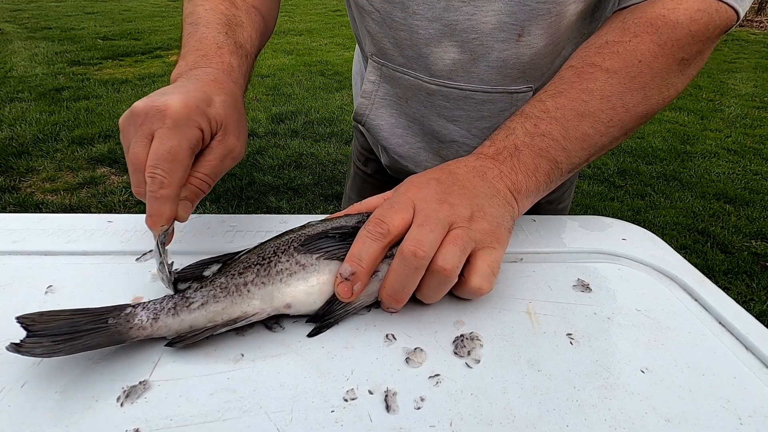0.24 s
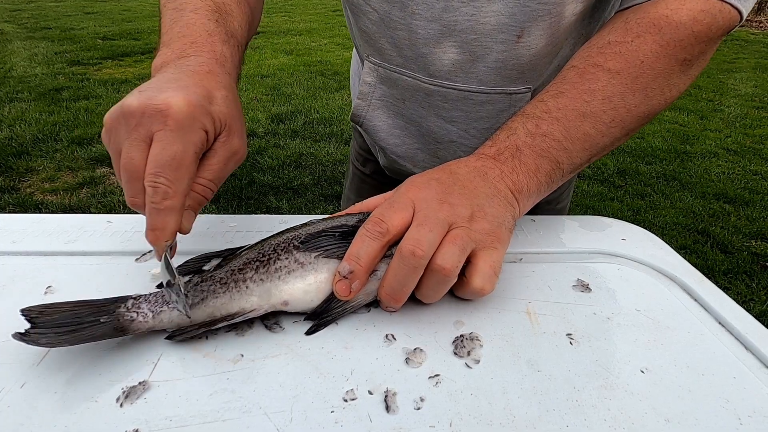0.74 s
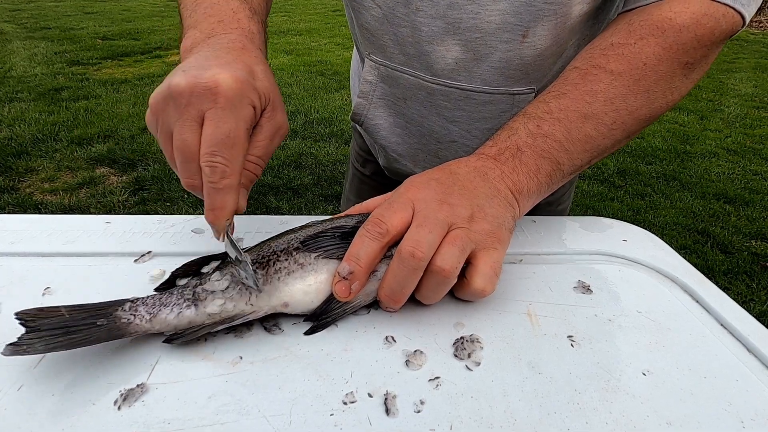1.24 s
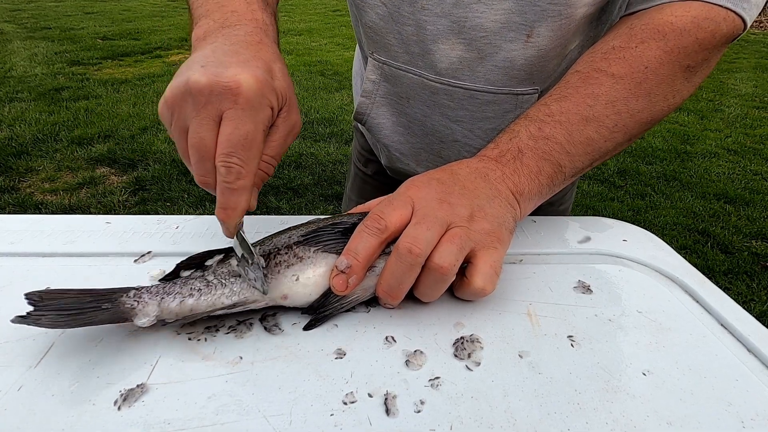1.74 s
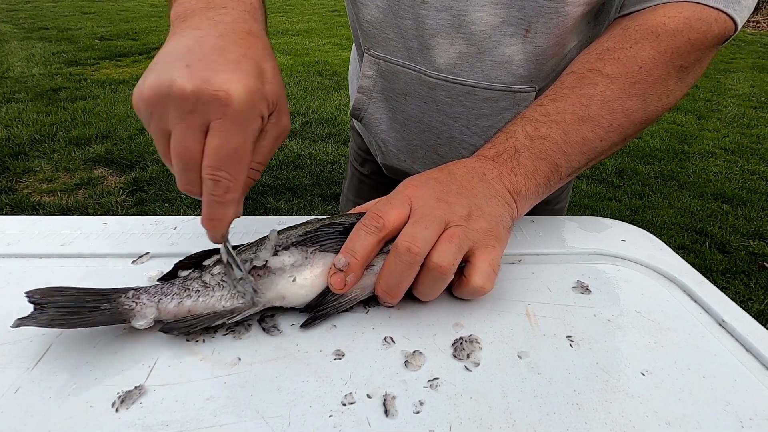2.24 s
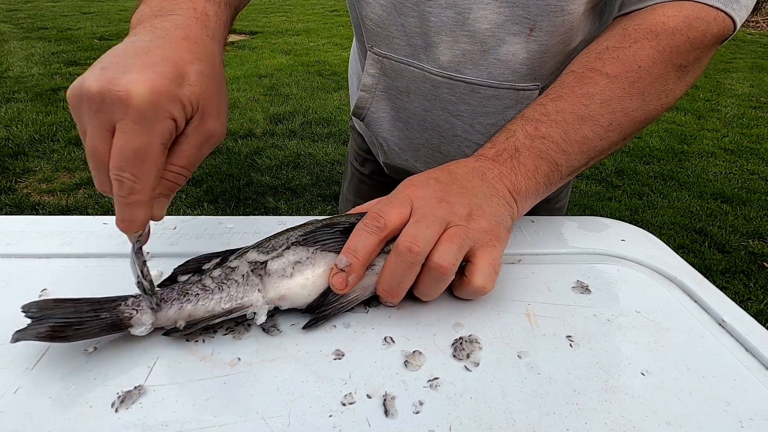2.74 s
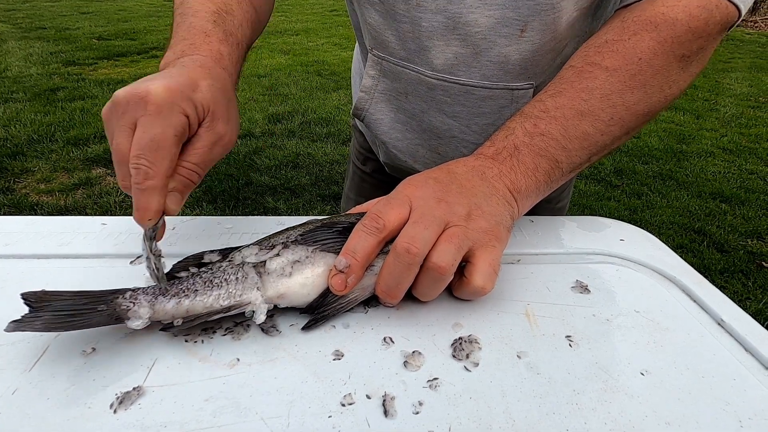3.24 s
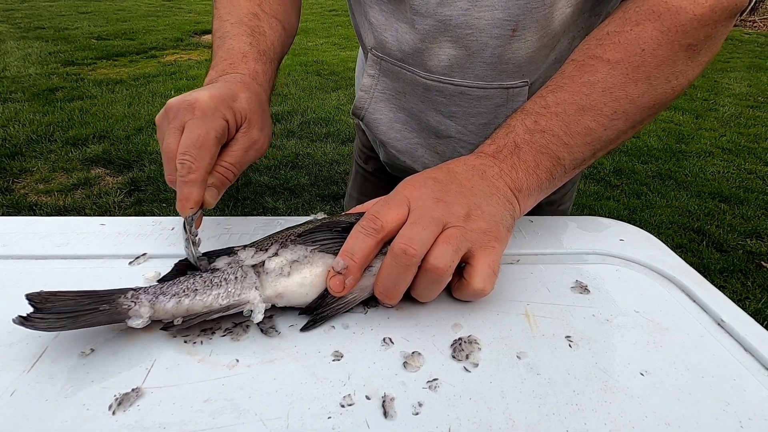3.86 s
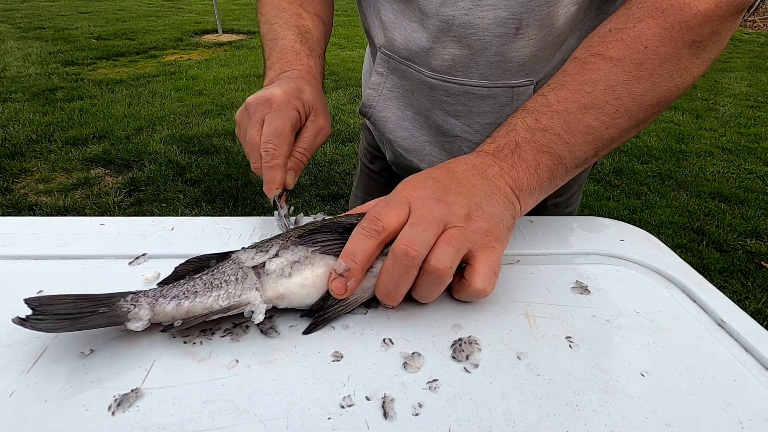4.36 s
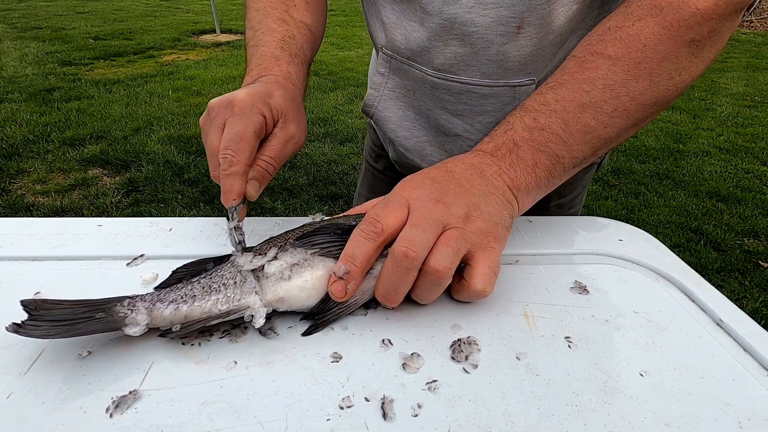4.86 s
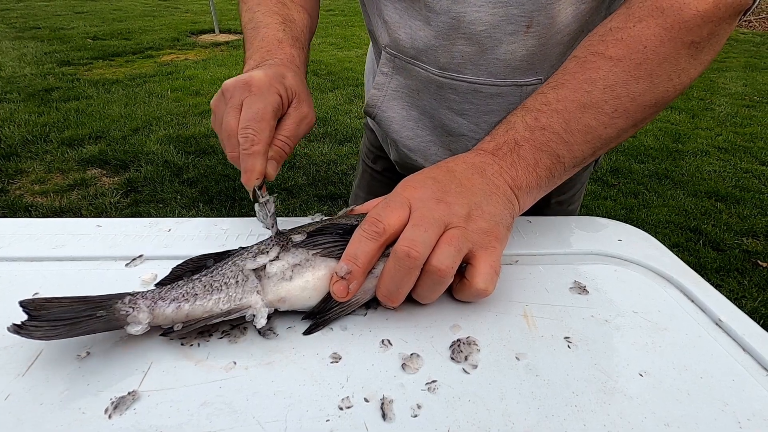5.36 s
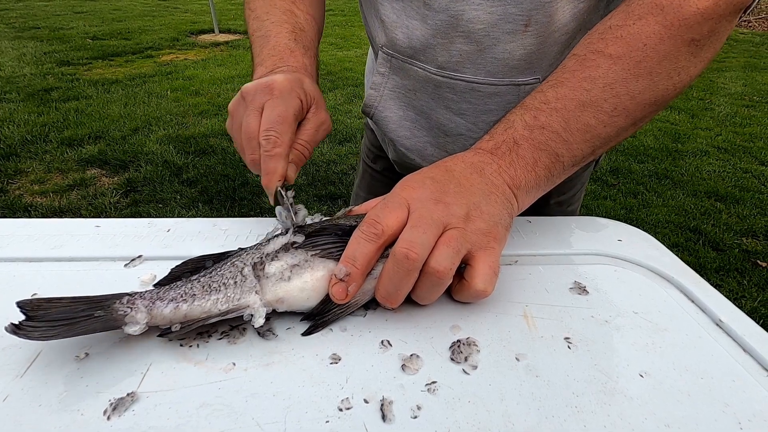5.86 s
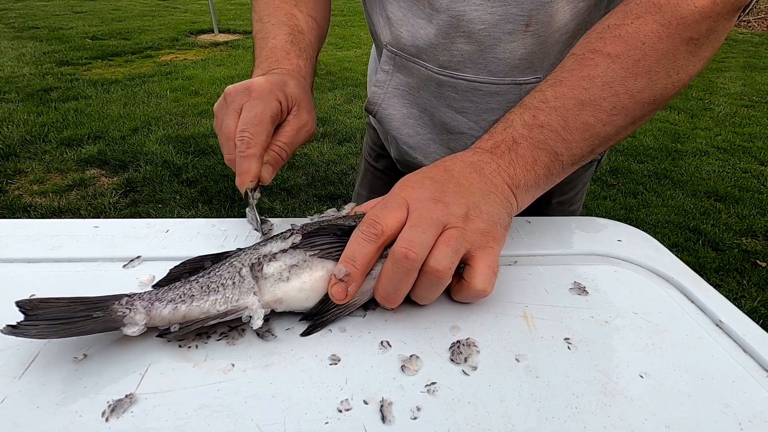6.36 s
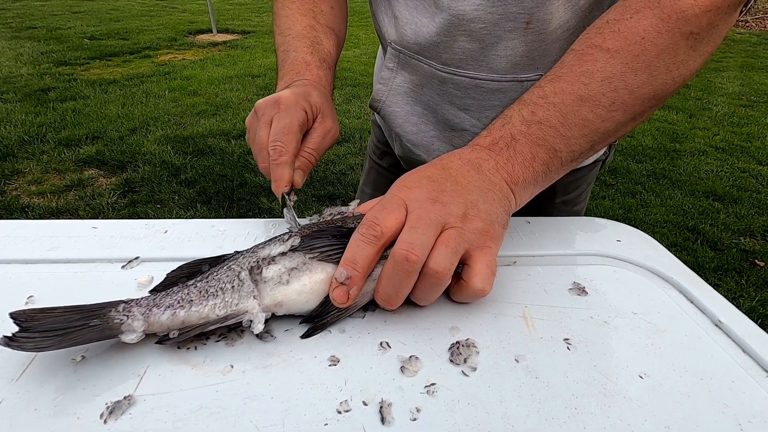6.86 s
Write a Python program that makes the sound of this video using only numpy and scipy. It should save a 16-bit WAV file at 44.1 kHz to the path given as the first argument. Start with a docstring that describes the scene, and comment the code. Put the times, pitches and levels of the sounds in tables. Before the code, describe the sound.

Close, dry outdoor sound of a metal spoon scraping a fish on a hollow plastic table. Short gritty rasps come three to four a second, each landing with a low thud and a drumming judder of the tabletop. Scales snap off with tiny bright clicks, wet skin squelches now and then, and quiet open air lies behind.

```python
"""Three to four raspy strokes a second, with snaps, wet squelches and low thuds over quiet open air:
a metal spoon scrapes the scales off a fish on a hollow plastic table on a lawn.
Rasp and slush are dense decaying slips; snaps are short ringing flicks; squelches and plops are noise resonances.
The table sums filtered judder, slow rocking and damped low swings; a faint far-off tone slides down.
Two ports receive the sum with their own balance and phase."""
import sys
import numpy as np
from scipy import signal
from scipy.fft import rfft, irfft
from scipy.io import wavfile
from scipy.ndimage import uniform_filter1d

SR = 44100
rng = np.random.default_rng(int(sys.argv[2]) if len(sys.argv) > 2 else 0)


def generate_wav(signal):
    """Clip the signal to [-1, 1] and save it as 16-bit WAV at the path in sys.argv[1]."""
    frames = np.transpose(np.atleast_2d(signal))
    scaled = np.clip(frames, -1, 1) * 32767
    pcm = np.round(scaled).astype(np.int16)
    wavfile.write(sys.argv[1], SR, pcm)


N = 313452
TIME = np.arange(N) / SR

# Spoon strokes, levels ahead of the layer gains: touch_s, build_up_to_crest_s, run_out_to_lift_s,
# rasp_db, push_into_table_db, landing_thud_db
STROKE_ROWS = [(-.018, .056, .04, -42, -39.5, -27), (.244, 0.042, 0.05, -51, -35, -54),
               (.508, 0.07, 0.059, -53, -37.5, -56), (.755, .06, 0.035, -42, -36.5, -46.5),
               (.975, 0.069, .05, -42, -34.5, -48), (1.236, .058, .042, -35, -38, -37.5),
               (1.505, 0.058, 0.073, -38, -39, -36), (1.776, 0.055, 0.095, -38, -41.5, -35.5),
               (2.045, 0.062, 0.096, -42, -38.5, -25), (2.324, 0.083, 0.029, -43, -43.5, -29.5),
               (2.609, 0.081, 0.052, -46, -49.5, -36.5), (2.88, 0.051, .085, -35, -40.5, -32),
               (3.132, 0.059, 0.094, -37.5, -35.5, -25), (3.4, .08, 0.097, -43, -39, -31.5),
               (3.724, 0.062, 0.083, -43.5, -35.5, -34), (4.041, 0.087, 0.052, -45.5, -41, -47),
               (4.369, .075, .05, -48, -42.5, -33.5), (4.669, 0.069, .065, -46, -38.5, -35),
               (4.973, .1, 0.048, -43, -33.5, -41), (5.295, .043, 0.099, -38.5, -46, -38),
               (5.619, 0.042, 0.1, -36.5, -48, -37), (5.94, 0.049, 0.087, -39, -39, -36.5),
               (6.256, .05, 0.077, -38, -42, -34.5), (6.542, 0.058, .04, -48.5, -36.5, -34.5),
               (6.812, 0.043, 0.048, -55.5, -37.5, -44)]
# Spectral density of the edge on scales, scaled to unit power in use: frequency_hz, relative_db
RASP_COLOUR = [(1200, -37), (2300, -2.5), (3000, -4), (3700, 1), (4300, 0.5), (5000, 0), (5800, 3.5),
               (6300, -9), (7300, -3.5), (9000, -8), (12000, -9), (14000, -13), (16000, -36)]


def undb(db):
    """Level to amplitude: 20 dB is a factor of ten."""
    return 10 ** (np.asarray(db) / 20)


def along(points, hz):
    """Interpolation on a log-frequency axis, where equal steps are equal ratios."""
    f, value = np.transpose(points)
    return np.interp(np.log(np.maximum(hz, 1)), np.log(f), value)


def colour(x, points):
    """Minimum-phase filtering: the folded cepstrum gives a causal response; white noise keeps its power."""
    size = 8192
    gain = undb(along(points, np.fft.rfftfreq(size, 1 / SR)))
    cepstrum = irfft(np.log(gain / np.sqrt(np.mean(gain ** 2))))
    cepstrum[1:size // 2] *= 2
    cepstrum[size // 2 + 1:] = 0
    response = irfft(np.exp(rfft(cepstrum)))
    return signal.fftconvolve(x, response)[:N]


def unit(x):
    """Power normalisation to rms 1."""
    return x / np.sqrt(np.mean(x ** 2))


def walk(rate):
    """Band-limited chance: random values, `rate` a second, joined by lines and scaled to rms 1."""
    values = rng.standard_normal(N // 8)
    return unit(np.interp(TIME * rate, np.arange(N // 8), values))


def add(out, s, sound):
    """Superposition: mix a sound in at a time in seconds."""
    start = int(s * SR)
    skip = max(-start, 0)
    part = sound[skip:max(N - start, 0)]
    out[start + skip:start + skip + len(part)] += part


def swell(times, dbs):
    """Exponential growth and decay: straight lines in dB, silent outside them."""
    gain = undb(np.interp(TIME, np.maximum.accumulate(times), dbs))
    return gain * (TIME > times[0]) * (TIME < times[-1])


def even(x, span_s):
    """Power levelling: hold a rough vibration near rms 1, as a steadily pressing hand does."""
    return x / np.sqrt(uniform_filter1d(x ** 2, int(span_s * SR)) + 1e-12)


def crackle(rate, spread_db):
    """Shot noise: random tiny slips of uneven size, `rate` a second on average, rms 1."""
    size = undb(spread_db * np.clip(rng.standard_normal(N), -2, 2))
    happens = rng.random(N) < rate / SR
    return unit(happens * rng.choice([-1, 1], N) * size)


def ragged_ring(hz, width_hz):
    """Resonance of finite bandwidth: low-passed noise modulates a carrier that may move; rms 1."""
    noise = rng.standard_normal((2, len(hz)))
    pole = np.exp(-np.pi * width_hz / SR)
    a, b = signal.lfilter([1], [1, -pole], noise)
    phase = 2 * np.pi * np.cumsum(hz) / SR
    return unit(a * np.cos(phase) + b * np.sin(phase))


def slips(gain, rate, spread_db, low_hz, high_hz, cycles, pan_db=3.0, turn=0.44, brighten=0.42, shared=0.39):
    """Stick-slip friction: tiny damped rings of their own pitch and place, denser under a firmer touch."""
    firmness = gain / gain.max()
    density = rate * firmness ** (1 / 4)
    at = np.flatnonzero(rng.random(N) < density / SR)
    size, pitch, pan, lag = rng.standard_normal((len(at), 4)).T
    size = unit(undb(spread_db * np.clip(size, -2, 1.6))) * gain[at]
    size *= np.sqrt(SR / density[at])  # power follows the gain, whatever the density
    # slips from the same scale share some of their pitch; a firmer edge makes them brighter
    lean = shared * walk(250)[at] + brighten * (1 + np.log10(firmness[at]))
    pitch = .5 + .5 * np.tanh(.7 * pitch + lean)
    turns = (low_hz + (high_hz - low_hz) * pitch)[:, None] * np.arange(128) / SR
    flick = turns * np.exp(-turns / cycles)
    out = []
    for side in (1, -1):
        # half the slips have inverted polarity; `turn` spreads the phase between the sides [radians]
        polarity_turns = (lag > 0)[:, None] / 2
        ring = np.sin(2 * np.pi * (turns + polarity_turns) + side * turn * lag[:, None]) * flick
        ring *= (size * undb(side * pan_db * pan / 2) / np.linalg.norm(ring, axis=1))[:, None]
        samples = at[:, None] + np.arange(ring.shape[1])
        out.append(np.bincount(samples.ravel(), ring.ravel(), N)[:N])
    return np.array(out)


def outdoors(air_db=-55.5, side_db=-4):
    """Broadband ambience and a tonal source: softly wavering air, and a faint far-off tone that slides down."""
    # Spectral density of the open air, scaled to unit power: frequency_hz, relative_db
    air_colour = [(20, -2), (50, -2), (120, -0.5), (170, 1), (250, -17.5), (400, -25.5), (550, -19.5),
                  (800, -34), (1200, -27), (2400, -28.5), (3600, -39), (5800, -32.5), (6600, -41),
                  (9000, -51.5), (13000, -59.5), (16000, -84)]
    # Swells of the faint tone: start_s, length_s, starting_pitch_hz (before a slight waver), level_db
    tone_rows = [(0.994, 0.6, 607, -67), (4.197, 0.7, 564, -69), (5.449, 0.49, 537.4, -69.5),
                 (6.006, .45, 573, -69)]
    waver_db, sag_hz_per_s = 1.5, 63
    mid, side = (colour(rng.standard_normal(N), air_colour) * undb(waver_db * walk(3.87)) for _ in range(2))
    for s, length, hz, db in tone_rows:
        age = np.clip(TIME - s, 0, length)
        pitch = (hz - sag_hz_per_s * age) * (1 + 0.0049 * walk(25))
        arch = np.sin(np.pi * age / length) * undb(2.5 * walk(12))
        tone = np.sqrt(2) * arch * np.sin(2 * np.pi * np.cumsum(pitch) / SR)
        mid = mid + undb(db - air_db) * tone
    return undb(air_db) * (mid + undb(side_db) * side * np.array([[1], [-1]]))


def stroke_gains(sway_ease_db=5, sway_fade_db=12, sway_rise_db=14):
    """Contact force drives every layer: bite, crest, lift and light drag back; harder landings rock more."""
    # Skin wetness, greater near the tail than on the back: time_s, slush_db (added to the slush level)
    wetness = [(0, -3), (.55, 1), (1.8, 4), (3.45, 1), (3.8, -1.5), (7.1, -1)]
    approach_s, return_s = .02, .19  # the spoon comes down; it drags lightly back
    bite_db, drag_db, drag_fade_db = -56, -66, 24  # rasp at the touch, at the lift, its fade on the way back
    shoulder_rise_db = 1.5  # rounds the rise of the rasp
    wet_db, wet_share = -54.5, .85  # slush under a -45 dB rasp; dB it gains for each dB of rasp
    push_peak_share, jolt_db = 0.8, -15  # hardest push in the build-up; drumming at the touch re the thud
    push_hold_s, push_sag_db = 0.023, 7.5  # the push lasts just past the crest and sags a little
    eased_db, eased_fade_db = -60, 19  # drumming at the lift and its fade
    rest_sway_db, sway_share = -40.5, 0.21  # rocking for a -41 dB thud row; dB it gains for each dB of thud
    rasp, push, sway = np.zeros((3, N))
    for touch, build, run_out, rasp_db, push_db, thud_db in STROKE_ROWS:
        start, crest = touch - approach_s, touch + build
        lift = crest + run_out
        end = lift + return_s
        shoulder_db = (bite_db + rasp_db) / 2 + shoulder_rise_db
        rasp_swell = swell([start, touch, touch + build / 2, crest, lift, end],
                           [-78, bite_db, shoulder_db, rasp_db, drag_db, drag_db - drag_fade_db])
        push_swell = swell([start, touch, touch + push_peak_share * build, crest + push_hold_s, lift, end],
                           [-76, thud_db + jolt_db, push_db, push_db - push_sag_db,
                            eased_db, eased_db - eased_fade_db])
        rock_db = rest_sway_db + sway_share * (thud_db + 41)
        sway_swell = swell([start, touch, lift, lift + approach_s, end],
                           [-sway_rise_db, 0, 0, -sway_ease_db, -sway_fade_db])
        rasp = np.maximum(rasp, rasp_swell)
        push = np.maximum(push, push_swell)
        sway = np.maximum(sway, undb(rock_db) * sway_swell)
    wet_gain = undb(wet_db + np.interp(TIME, *np.transpose(wetness)))
    slush = wet_gain * (rasp / undb(-45)) ** wet_share
    return rasp, slush, push, sway


def scraping(rasp, slush, rasp_db=-2, slush_db=-5, catch_db=3.0):
    """Modulated friction: catches on row after row of scales are bursts of dry slips and duller wet ones."""
    # Spectral density of the wet slips, scaled to unit power: frequency_hz, relative_db
    slush_colour = [(400, -1.5), (700, -8.5), (1050, 3), (1700, 7), (2300, 1), (3200, 7), (6000, -35)]
    catches = unit(undb(catch_db * np.clip(walk(150), -2, 1.6)))
    dry_slips = slips(rasp * catches, rate=8000, spread_db=0.5, low_hz=1240, high_hz=13950, cycles=0.33)
    wet_slips = slips(slush * catches, rate=3000, spread_db=5.5, low_hz=445, high_hz=3080, cycles=0.57)
    return np.array([undb(rasp_db) * colour(d, RASP_COLOUR) + undb(slush_db) * colour(w, slush_colour)
                     for d, w in zip(dry_slips, wet_slips)])


def drumming(push, row_hz=165, wander=.3, jitter=.12, rough_db=-5, split_hz=200, upper_db=1, waver_db=2.0):
    """Forced vibration: near-even judder drives the top; its tone wavers at random between high and low."""
    # Spectral density of the table top, scaled to unit power: frequency_hz, relative_db
    top_colour = [(50, -6), (100, 5), (150, 1.5), (190, -5.5), (230, 4), (290, -1.5), (325, -4.5),
                  (350, -2.5), (430, -4.5), (480, -11.5), (540, -10.5), (630, -23), (900, -36), (2000, -63)]
    rows_passed = np.cumsum(row_hz * np.exp(wander * walk(12) + jitter * walk(200))) / SR
    beats = np.diff(np.floor(rows_passed), prepend=0)  # one for each row of scales
    beats = unit(beats - beats.mean()) + undb(rough_db) * crackle(rate=640, spread_db=1.5)
    judder = even(colour(beats, top_colour), 0.032)
    low = signal.sosfiltfilt(signal.butter(2, split_hz, fs=SR, output="sos"), judder)
    upper = undb(upper_db + waver_db * walk(12))
    return push * (low / upper + (judder - low) * upper)


def table(push, sway, drum_db=2, sway_db=-3, thud_db=3.5, cycles=0.69, side_db=-6, drum_side_db=-14):
    """Driven and transient response: judder drums the hollow top; landings and bumps rock it a cycle or two."""
    # Spectral density of the rocking, scaled to unit power: frequency_hz, relative_db
    sway_colour = [(12, -12.5), (25, 10), (40, 4.5), (60, 1.5), (72, 4), (110, -3.5), (135, -8.5),
                   (200, -19), (400, -67)]
    # The spoon jumps off a scale and bumps the table: time_s, level_db (before thud_db),
    # pitch_hz (before a random 7 % spread)
    bump_rows = [(0.024, -30, 100), (0.313, -34, 83), (.802, -32.5, 79), (1.069, -35.5, 39.7),
                 (1.309, -29, 87.93), (1.589, -33.5, 70), (2.924, -32, 91.4), (4.772, -32, 56),
                 (5.081, -29, 92.2), (5.664, -33.5, 54.09), (6.02, -25, 74.36), (6.345, -31.5, 93.9),
                 (6.616, -33, 74.87)]
    landing_hz, landing_lag_s = 45.4, 0.0081  # the table gives as the spoon lands; same pitch spread
    mid, side = (undb(sway_db) * sway * even(colour(rng.standard_normal(N), sway_colour), 0.051)
                 for _ in range(2))
    t, thuds = np.arange(-4096, 4096) / SR, np.zeros(N)
    landings = [(touch + landing_lag_s, db, landing_hz) for touch, *_, db in STROKE_ROWS]
    for s, db, hz in landings + bump_rows:
        turns = hz * np.exp(0.07 * rng.standard_normal()) * t
        swing = -np.sin(2 * np.pi * turns) * np.exp(-(turns / cycles) ** 2)
        add(thuds, s + t[0], undb(db) * swing)
    mid = mid + undb(drum_db) * drumming(push) + undb(thud_db) * thuds
    side = undb(side_db) * side + undb(drum_db + drum_side_db) * drumming(push)
    return mid + side * np.array([[1], [-1]])


def flakes(rasp, flake_db=-7, rate=50, firm_db=-59):
    """Sparse impacts: loose scales tick against the spoon, their force capped at that of a light drag."""
    drag = np.minimum(rasp, undb(firm_db))
    ticks = slips(drag, rate, spread_db=3.5, low_hz=1200, high_hz=7000, cycles=.45)
    return undb(flake_db) * np.array([colour(side, RASP_COLOUR) for side in ticks])


def small_snaps(rasp, count=4, over_db=1, spread_db=3, least_db=-60, reach_s=.16, pitch_hz=4500, pitch_spread=.35):
    """Random release: lesser scales let go in every stroke, louder under a firmer edge; rows as for snaps."""
    touches = np.repeat([row[0] for row in STROKE_ROWS], count)
    s = touches + reach_s * rng.random(len(touches))
    size, pitch = np.clip(rng.standard_normal((len(s), 2)), -2, 2).T
    force = undb(over_db) * np.interp(s, TIME, rasp) + undb(least_db)
    db = 20 * np.log10(force) + spread_db * size
    return list(zip(s, db, pitch_hz * np.exp(pitch_spread * pitch)))


def snaps(rows, snap_db=8.5, ring_s=0.00039, tick_db=-8, flutter_db=-14.0, flutter_s=0.004, onset_s=0.0012,
          pan_db=4.5):
    """Damped ringing: a scale flicks free at its own pitch with a soft, ragged onset and flutters briefly."""
    lead = 320  # samples of soft onset
    t = np.arange(-lead, 1024) / SR
    after = np.maximum(t, 0)
    flick = (after / ring_s * np.exp(1 - after / ring_s)) ** 2
    shiver = np.exp(-after / flutter_s + np.minimum(t, 0) / onset_s)
    rings, ticks = np.zeros((2, 2, N))
    for s, db, hz in rows:
        tick, common, *own = np.clip(rng.standard_normal((4, len(t))), -2, 2)
        flutters = (np.sqrt(3) * common + np.array(own)) / 2  # partly shared by the two sides
        pan = pan_db * rng.standard_normal() / 2
        body = flick * np.sin(2 * np.pi * hz * t)
        body += undb(flutter_db) * shiver * ragged_ring(np.full(len(t), hz), 870)
        for ring, noise, flutter, gain in zip(rings, ticks, flutters, undb([db + pan, db - pan])):
            add(ring, s + t[0], gain * body)
            add(noise, s + t[0], gain * (undb(tick_db) * tick * flick + undb(flutter_db - 2.0) * flutter * shiver))
    # spectral density of the noise: frequency_hz, relative_db
    noise_colour = [(300, -8), (800, -6.5), (1400, 4.5), (2500, 1.5), (5200, 2.5), (8000, 2), (12000, -3.5),
                    (16000, -40.5)]
    return undb(snap_db) * (rings + np.array([colour(noise, noise_colour) for noise in ticks]))


def squelches(fall_s=0.0068, width_hz=2200, tail_db=-9, tail_s=0.011):
    """Falling cavity resonance: a wet gap pulls open with a sharp smack, then a softer tail dropping in pitch."""
    # Wet skin letting go of the spoon: time_s, level_db (before the colour),
    # pitch_scale_hz (the resonance falls from 1.53 times this towards 0.13 times)
    squelch_rows = [(.444, -54, 5000), (.7445, -53, 4200), (1.357, -48, 5200), (1.673, -48, 3400),
                    (2.039, -45, 3000), (2.269, -49, 4000), (2.745, -51, 3800), (3.252, -48, 4800),
                    (3.2975, -49, 4800), (3.696, -50, 3400)]
    t, out = np.arange(2048) / SR, np.zeros(N)
    smack_s = .002
    fade = np.exp(-t / smack_s) + undb(tail_db) * np.exp(-t / tail_s)
    for s, db, hz in squelch_rows:
        falling_hz = hz * (0.13 + 1.4 * np.exp(-t / fall_s))
        add(out, s, undb(db) * fade * ragged_ring(falling_hz, width_hz))
    return colour(out, [(400, -29), (1200, 11), (6000, 4.0), (7000, -10), (16000, -4.5)])


def plops(plop_db=1, fade_s=0.014, width_hz=130, tick_db=2, tick_s=0.002):
    """Air-pocket resonance: small pockets under the fish pop with a wet tick and ring briefly."""
    # Small wet plops: time_s, level_db (before plop_db), pitch_hz
    plop_rows = [(1.105, -56, 1034), (1.577, -46, 980), (3.645, -52.5, 1008), (3.647, -57.5, 1438),
                 (5.185, -55, 1072), (6.651, -50.5, 1145), (6.651, -50.5, 1399)]
    t, out = np.arange(4096) / SR, np.zeros(N)
    for s, db, hz in plop_rows:
        pitch = np.full(len(t), float(hz))
        pocket = ragged_ring(pitch, width_hz) * np.exp(-t / fade_s)
        tick = undb(tick_db) * ragged_ring(1.6 * pitch, 580) * np.exp(-t / tick_s)
        add(out, s, undb(db + plop_db) * (pocket + tick))
    return out


def scene():
    """Superposition: spoon on scales, table below, lawn around."""
    # Single scales snapping loose: time_s, level_db (before the snap gain and pan), pitch_hz
    snap_rows = [(0.1075, -47.5, 6145), (0.8025, -40, 5820), (0.8141, -39, 3032), (1.042, -34, 5230),
                 (1.2391, -37.5, 3158), (1.2984, -22, 5660), (1.42, -51, 6647), (1.577, -30.5, 4080),
                 (1.6117, -29.5, 4970), (1.7358, -48.5, 2791), (1.815, -32, 4148), (1.8618, -34.5, 4810),
                 (1.8797, -34, 2755), (2.1047, -26.5, 4084), (2.144, -36, 2566), (2.2475, -46, 5530),
                 (2.3741, -28, 5410), (2.413, -21.5, 5394), (2.7114, -23.5, 5626), (2.9354, -28.5, 6266),
                 (2.944, -30.5, 5625), (3.058, -54.5, 6700), (3.1876, -32, 5230), (3.194, -30.5, 5370),
                 (3.2095, -31, 6620), (3.2332, -34, 5764), (3.3461, -53, 3730), (3.4592, -31, 5276),
                 (3.5005, -35.5, 2695), (3.9079, -48.5, 6950), (4.1393, -45, 3990), (4.451, -45, 3984),
                 (5.0291, -32, 5737), (5.3917, -39, 4970), (5.4772, -45.5, 4618), (5.6406, -36.5, 5210),
                 (5.6646, -29, 4384), (5.958, -39.5, 5250), (6.0081, -30, 4510), (6.3188, -37, 10060),
                 (6.3421, -38, 4980), (6.606, -30.5, 3572)]
    air = outdoors()
    rasp, slush, push, sway = stroke_gains()
    spoon = scraping(rasp, slush) + flakes(rasp)
    scales = snaps(snap_rows + small_snaps(rasp))
    wet_skin = squelches() + plops()
    return air + spoon + table(push, sway) + scales + wet_skin


def record(dry):
    """Two-port reception: frequency-dependent level and phase differences; the top is cut."""
    # Level difference of the ports: frequency_hz, left_minus_right_db
    port_balance = [(60, -.5), (250, .8), (600, .3), (1300, 2), (2400, 3), (4400, 4), (6000, 0), (8100, -3),
                    (15000, -5)]
    # Phase difference of the ports: frequency_hz, left_lead_rad
    port_phase = [(50, 0), (600, -.3), (3400, -.55), (4800, -.15), (5500, -.3), (6200, -1.6), (6900, -.6),
                  (8300, -.4), (9700, .5), (11000, 0), (16000, 0)]
    top_hz = 16200
    hz = np.fft.rfftfreq(N, 1 / SR)
    left = undb(along(port_balance, hz) / 2) * np.exp(1j * along(port_phase, hz) / 2)
    ports = irfft(rfft(dry) * np.array([left, 1 / left]), N)
    return signal.sosfilt(signal.ellip(8, .2, 70, top_hz, fs=SR, output="sos"), ports)


dry = scene()
out = record(dry)
generate_wav(out)
```